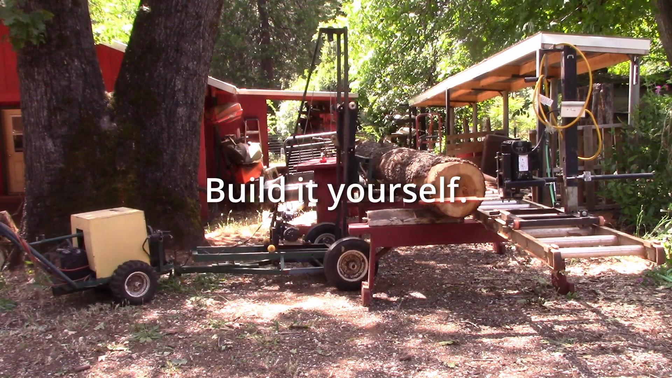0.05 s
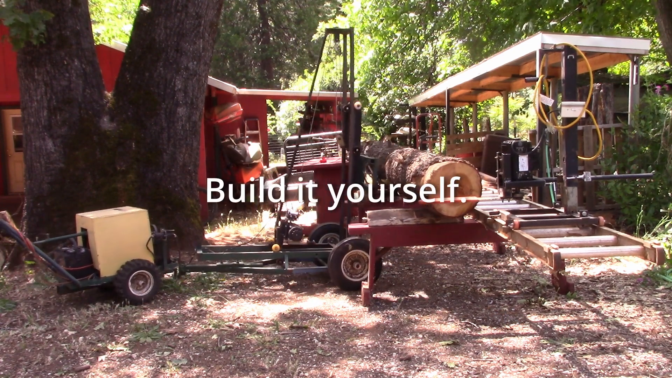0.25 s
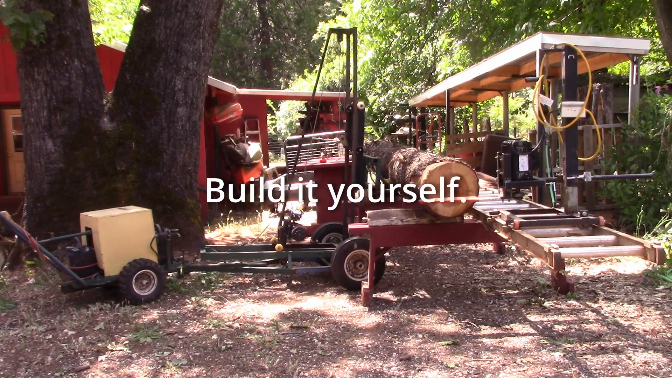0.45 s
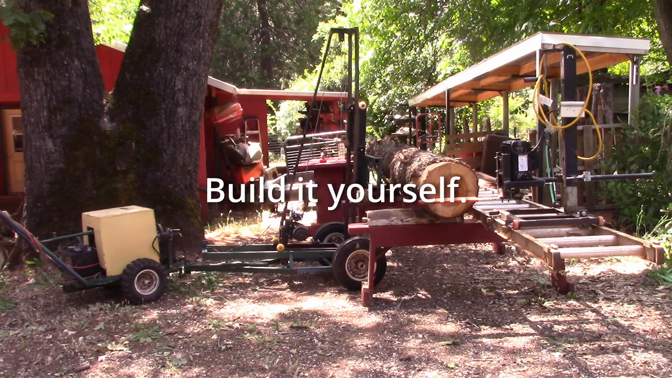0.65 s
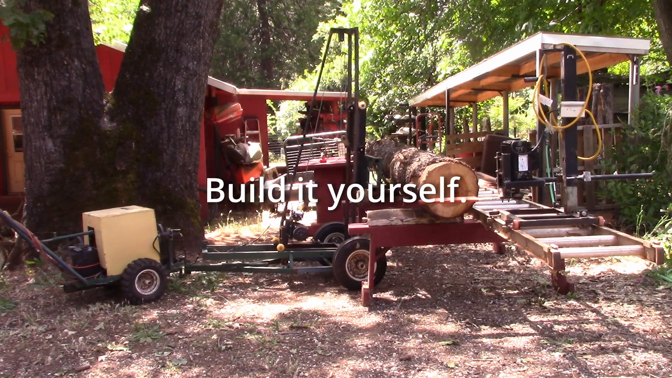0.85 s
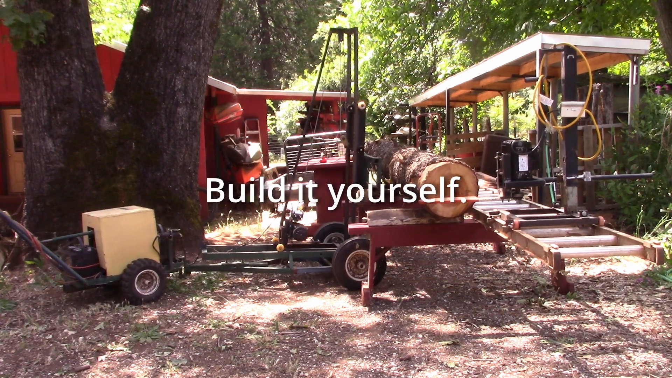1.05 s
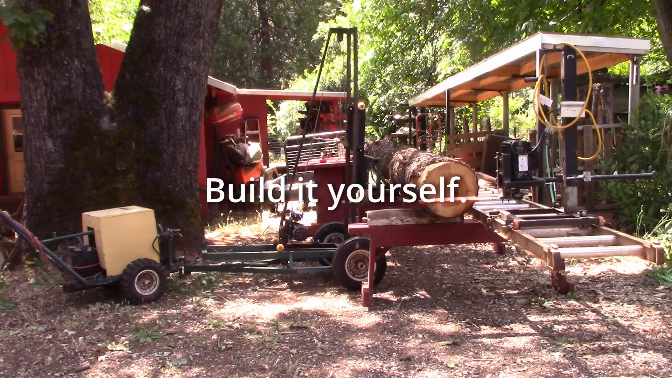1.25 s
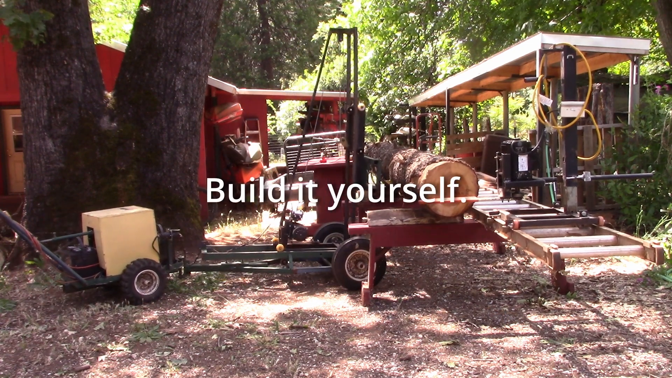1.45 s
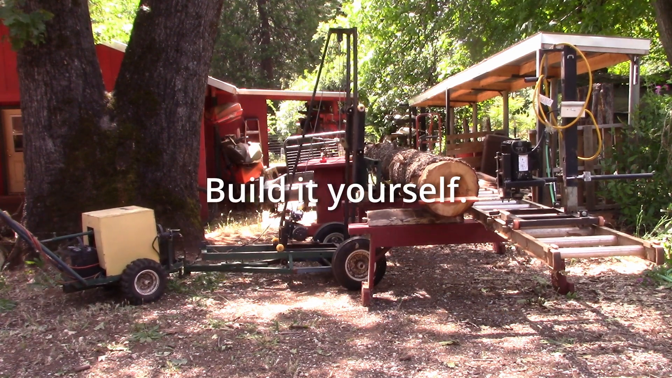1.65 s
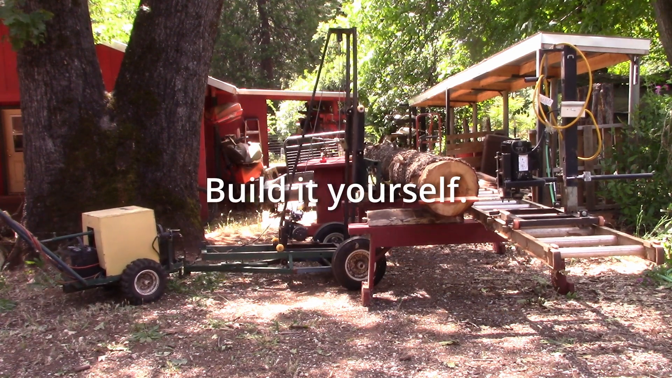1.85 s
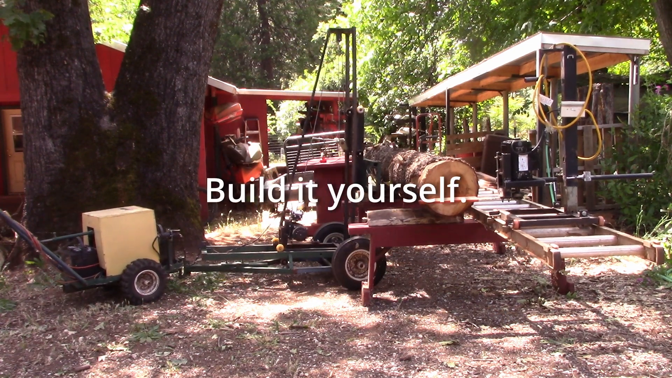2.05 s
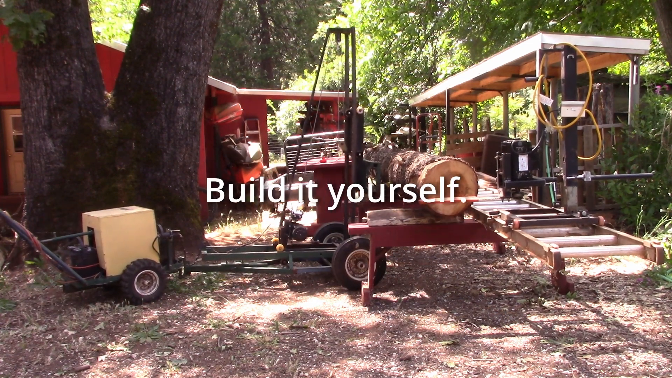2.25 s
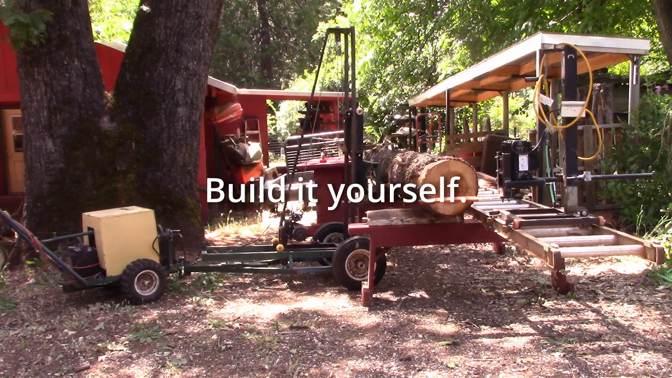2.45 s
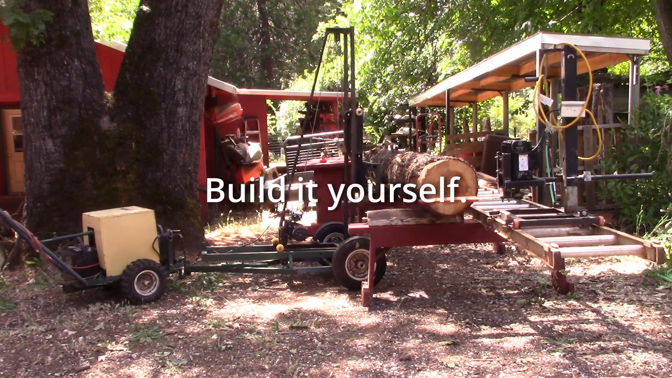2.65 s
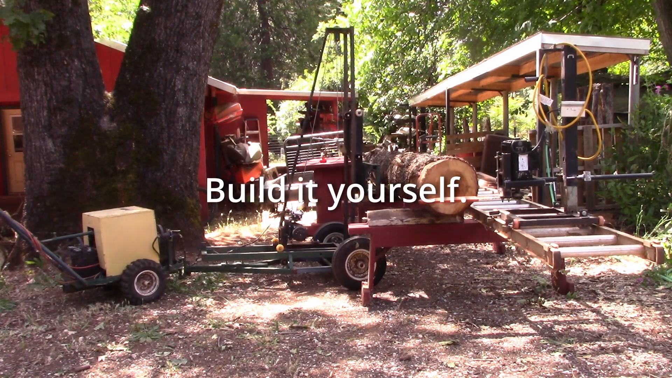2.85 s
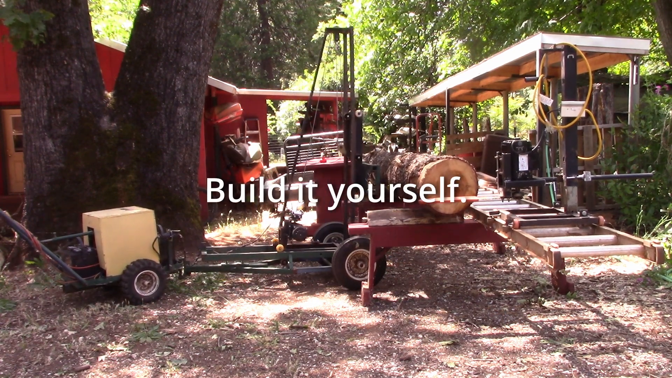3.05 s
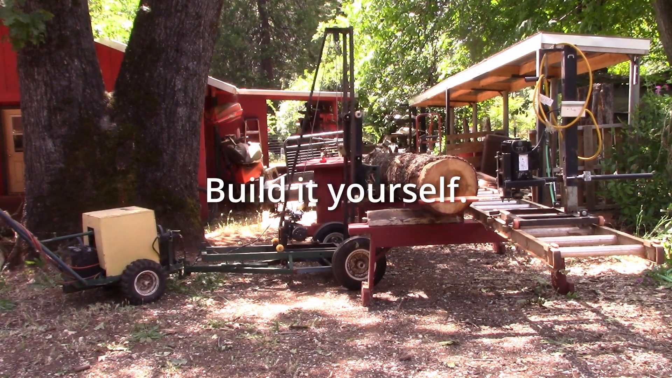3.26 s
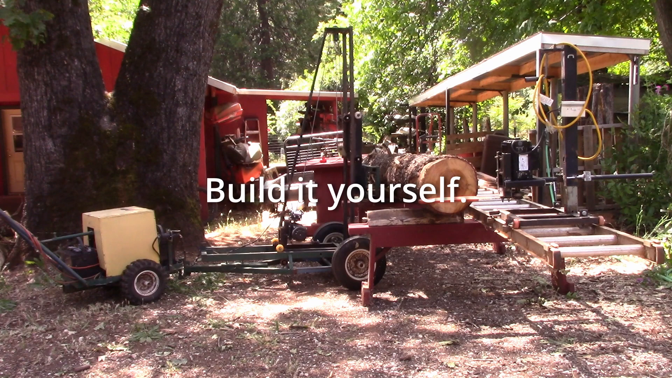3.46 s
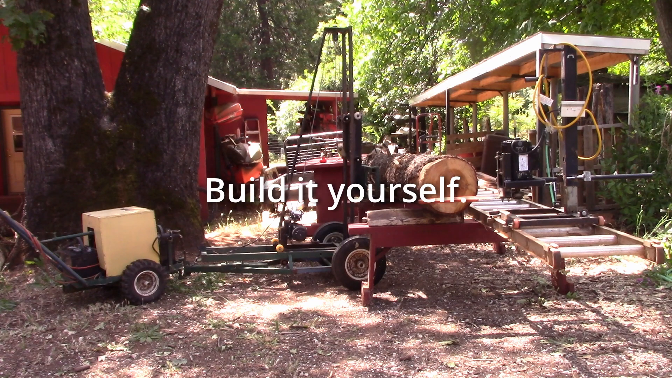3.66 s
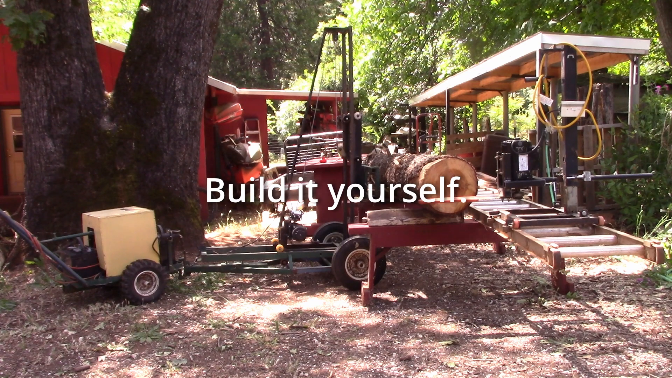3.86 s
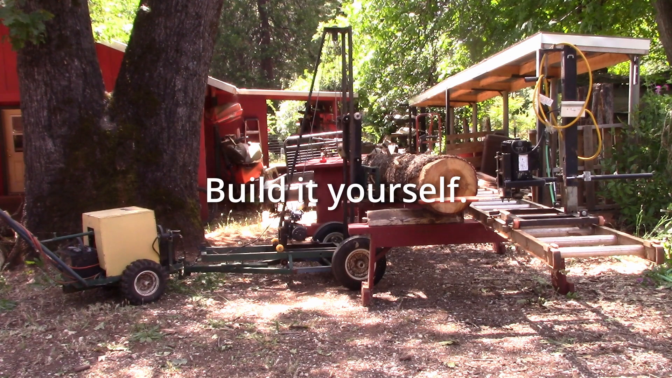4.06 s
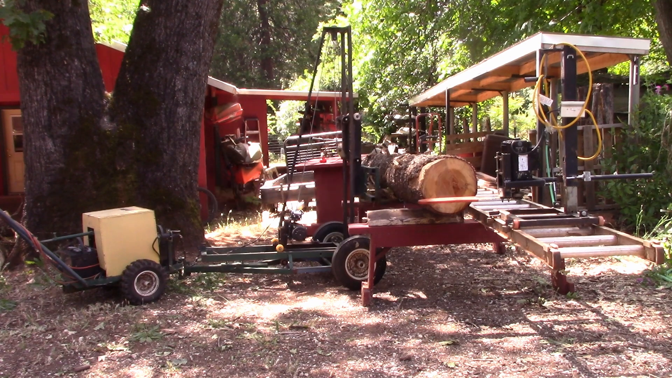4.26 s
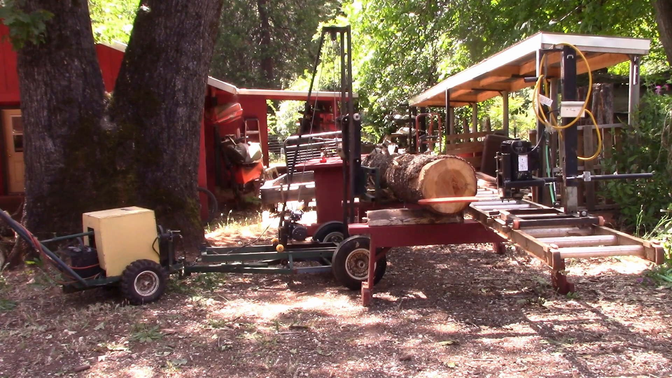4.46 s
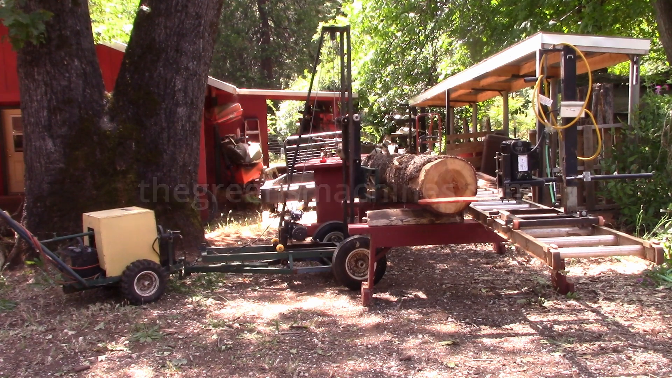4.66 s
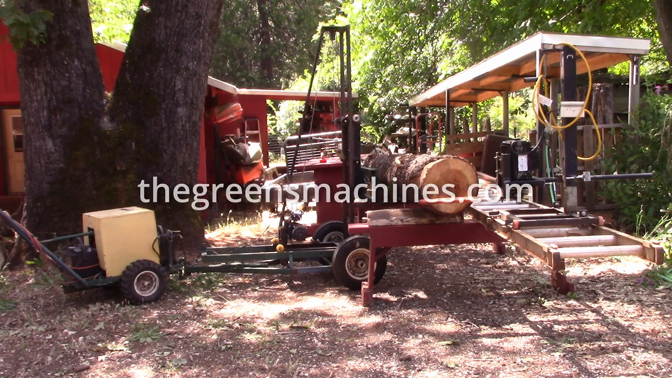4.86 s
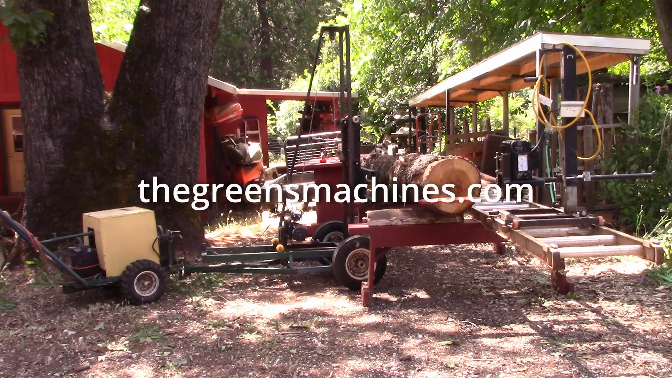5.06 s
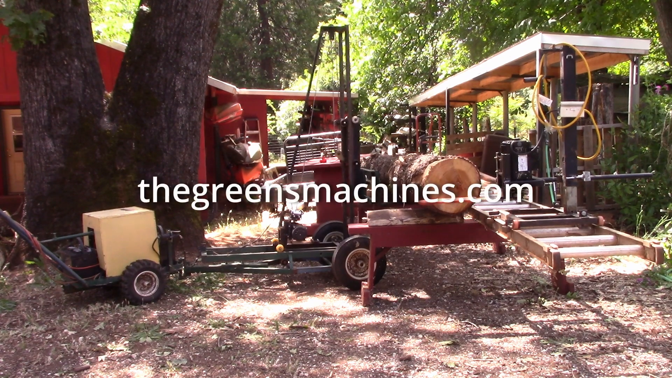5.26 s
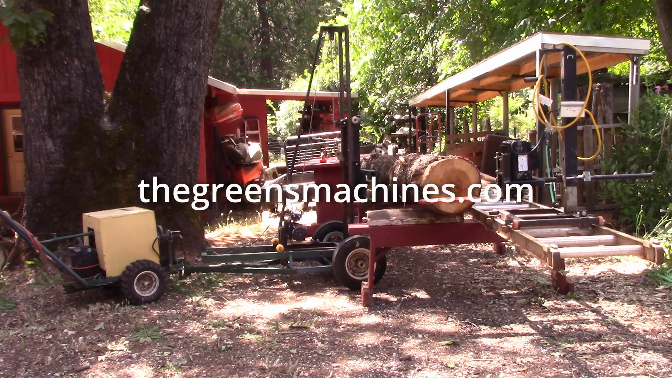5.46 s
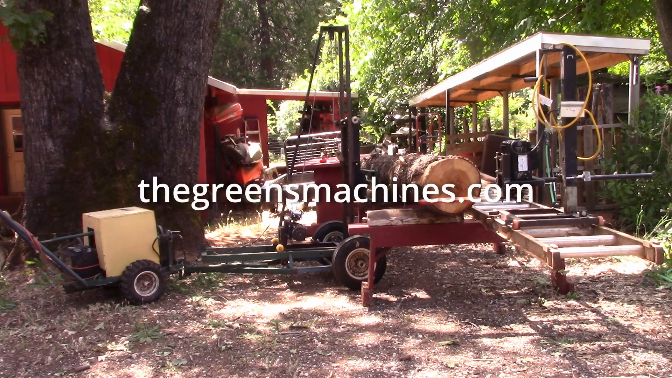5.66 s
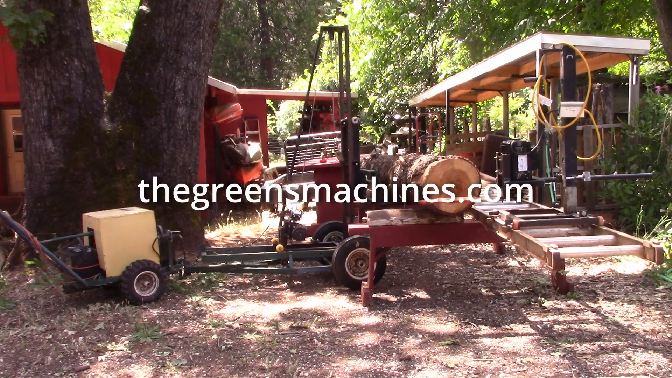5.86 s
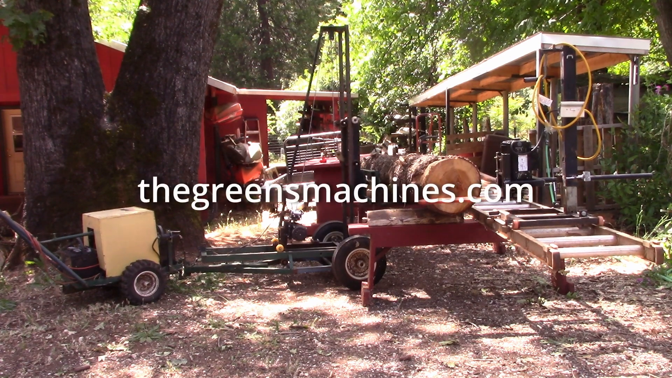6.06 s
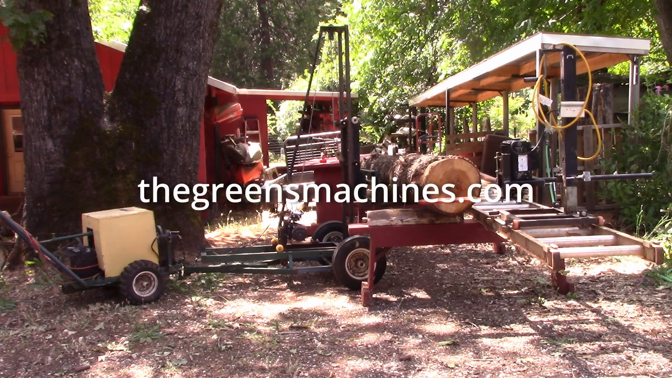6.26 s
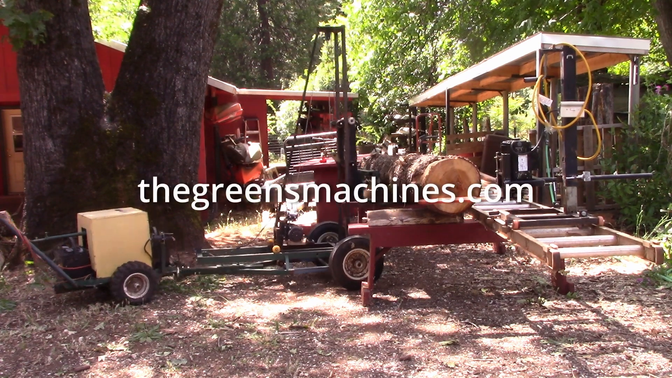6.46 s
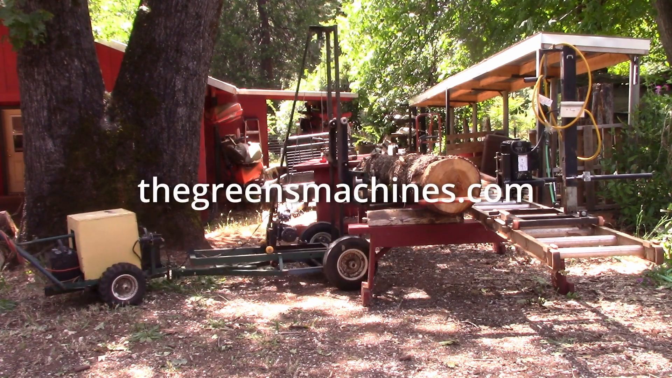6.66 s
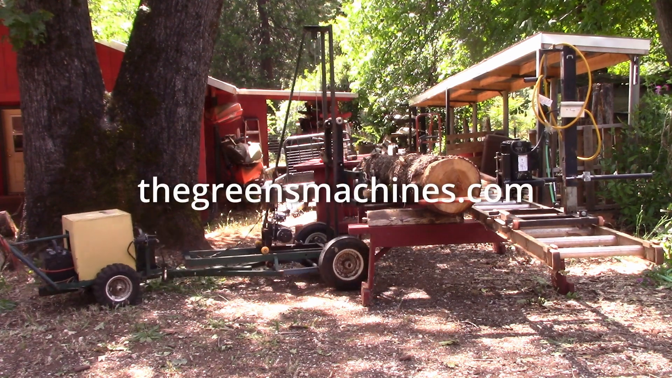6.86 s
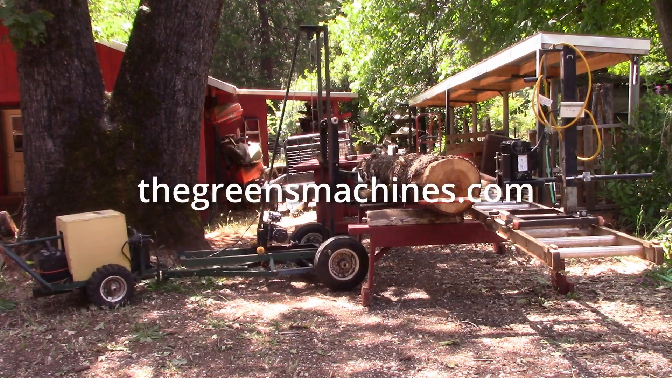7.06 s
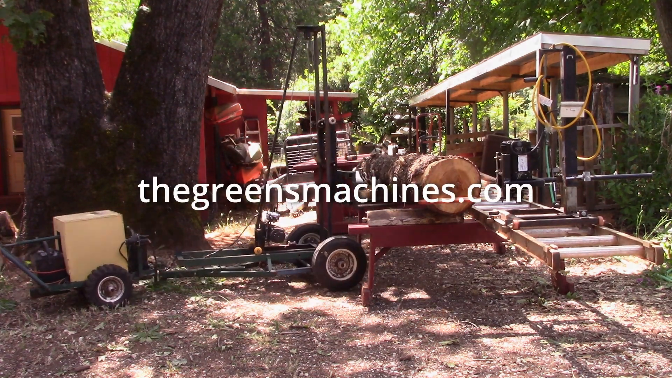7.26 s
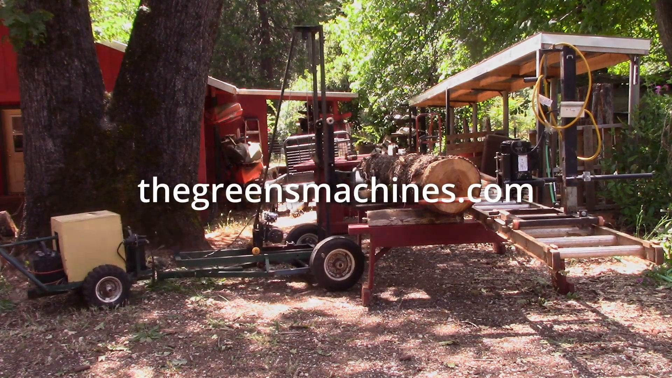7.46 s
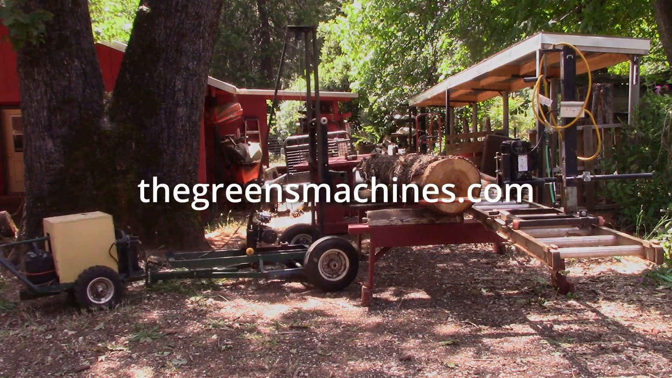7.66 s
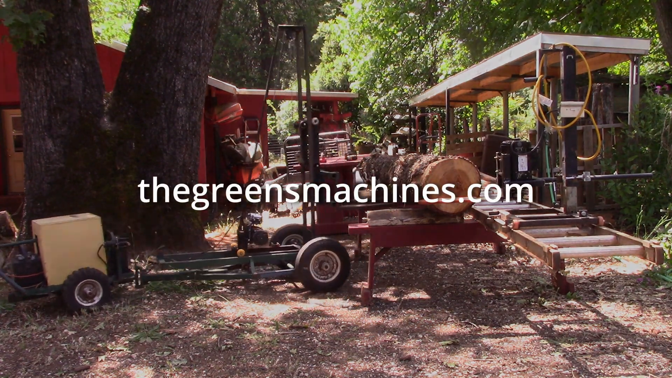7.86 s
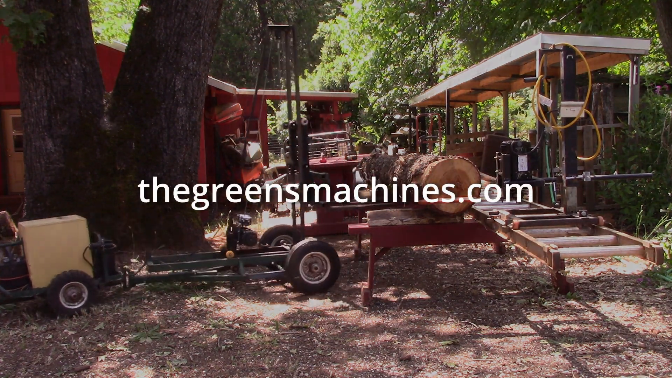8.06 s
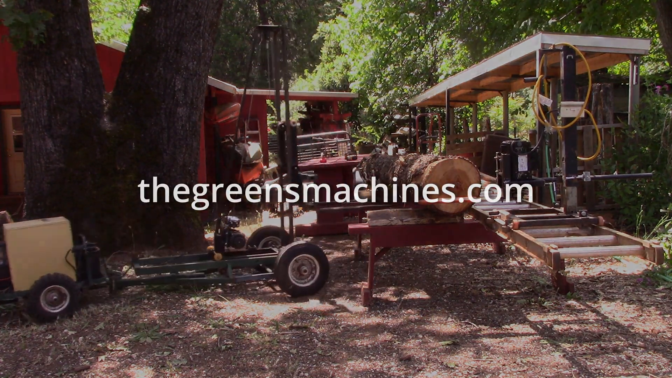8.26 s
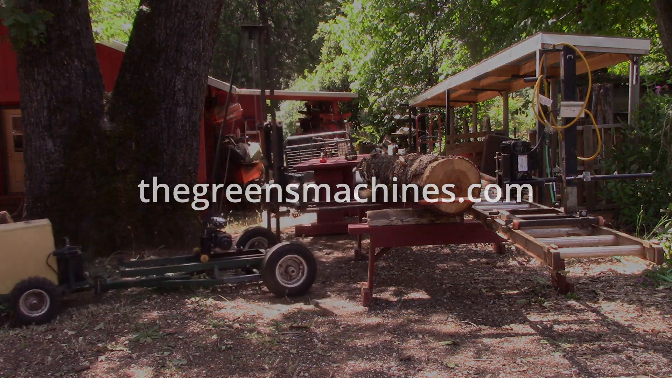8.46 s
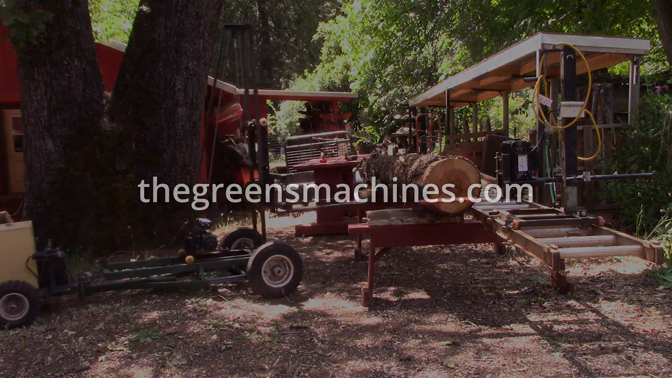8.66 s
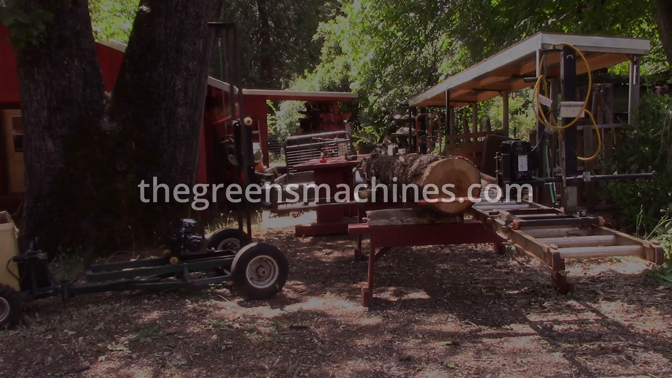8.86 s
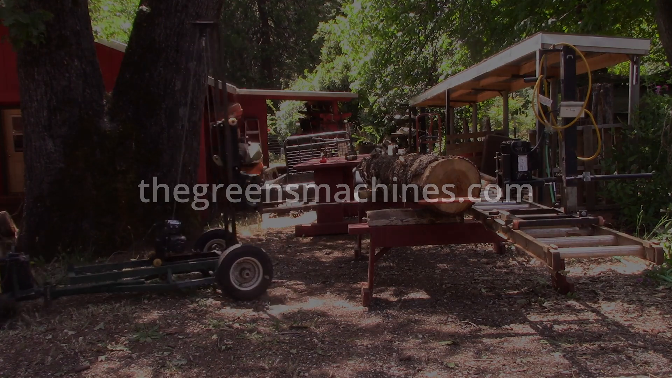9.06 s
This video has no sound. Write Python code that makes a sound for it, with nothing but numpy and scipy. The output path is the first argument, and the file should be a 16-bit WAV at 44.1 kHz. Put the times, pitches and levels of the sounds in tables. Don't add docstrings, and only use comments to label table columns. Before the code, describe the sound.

A small electric forklift cart works in a leafy yard. It coasts down with low rumble and frame ticks, then its lift whirs steadily twice with a gritty, brushy buzz and chain ticks. Dull knocks and light jingles follow. A sharp solenoid clack precedes a jolt, brief scrape and ringing steel clatter. A second clack starts the drive, whining upward until the end. Close outdoor pickup, slightly left of centre, with slight wind.

```python
import sys
import numpy as np
from scipy import signal
from scipy.fft import rfft, irfft, next_fast_len
from scipy.io import wavfile
from scipy.ndimage import uniform_filter1d

SR = 44100
rng = np.random.default_rng(int(sys.argv[2]) if len(sys.argv) > 2 else 0)


def to_linear_factor(level_db):
    exponent = np.asarray(level_db, float) / 20
    return 10 ** exponent


def inscribe(sig):
    pcm = np.round(np.clip(np.atleast_2d(sig).T, -1, 1) * 32767)
    wavfile.write(sys.argv[1], SR, pcm.astype(np.int16))


N = 402175
CLOCK = np.arange(N) / SR
LEFT_RIGHT = np.array([[1], [-1]])

# start_s, rumble_db
DRIVE = [
    [(0, -38.5), (.4, -48.5), (.6, -54), (.75, -65), (.93, -92)],
    [(6.13, -61), (6.16, -46), (6.2, -46), (6.3, -40), (6.55, -40.5), (6.8, -42), (7.1, -48.5),
     (7.3, -50.5), (7.44, -59)],
    [(7.38, -57), (7.46, -45), (7.74, -39), (8.05, -41), (8.38, -41), (8.8, -40.5), (9.12, -41.5)],
]
# pitch_hz, width_hz, level_db
LOAD_MODES = [(403, 38, 0.5), (518, 23, -3), (783, 86, -6.5), (1040, 72, -1.5), (1300, 1100, -8)]


def evened(x):
    return x / np.sqrt(np.mean(x ** 2) + 1e-20)


def peaked(x):
    return x / abs(x).max()


def read(points, hz):
    f, value = np.transpose(points)
    return np.interp(np.log(hz + 1), np.log(f + 1), value)


def column(tables, rest):
    out = np.full(N, float(rest))
    for rows in tables:
        rows = np.array(rows)
        on = (CLOCK >= rows[0, 0]) & (CLOCK <= rows[-1, 0])
        out[on] = np.interp(CLOCK[on], rows[:, 0], rows[:, 1])
    return out


def level(tables):
    return uniform_filter1d(to_linear_factor(column(tables, -150)), size=300)


def colour(x, points):
    n = next_fast_len(x.shape[-1])
    gain = to_linear_factor(read(points, np.fft.rfftfreq(n, 1 / SR)))
    return irfft(rfft(x, n) * gain, n)[..., :x.shape[-1]]


def body(x, modes):
    out = np.zeros(len(x))
    for k, (hz, width_hz, db) in enumerate(modes):
        peak = signal.iirpeak(hz, hz / max(width_hz, 4), SR)
        out += (-1) ** k * to_linear_factor(db) * signal.lfilter(*peak, x)
    return out


def in_phase(x, modes):
    return sum(body(x, [mode]) for mode in modes)


def dulled(x, hz):
    return signal.lfilter(*signal.butter(3, min(hz, .49 * SR), fs=SR), x)


def drift(hz):
    return evened(signal.lfilter(*signal.butter(2, hz, fs=SR), rng.standard_normal(N)))


def add(mix, start_s, sound):
    part = mix[round(start_s * SR):][:len(sound)]
    part += sound[:len(part)]


def burst(rise_s, t60_s, rattle_db, hold_s=0):
    t = CLOCK[:9000]
    noise, lumps = rng.standard_normal((2, 9000))
    lumps = evened(uniform_filter1d(lumps, size=40))
    fall_db = 60 * np.maximum(t - hold_s, 0) / max(t60_s, .004)
    return noise * to_linear_factor(rattle_db * lumps - fall_db) * (1 - np.exp(-(t / rise_s) ** 2))


def crackle(per_s, spread_db, modes):
    size = to_linear_factor(spread_db * np.minimum(rng.exponential(1, N), 4)) * (rng.random(N) < per_s / SR)
    shape = signal.oaconvolve(size, to_linear_factor(-60 * CLOCK[:2000] / 0.081))[:N]
    return evened(body(shape * rng.standard_normal(N), modes))


def echoes(x, t60_s):
    tail = rng.standard_normal((2, 16000)) * to_linear_factor(-60 * CLOCK[:16000] / t60_s)
    tail[:, :300] = 0
    return signal.fftconvolve(x[None], tail / np.linalg.norm(tail[0]), axes=1)[:, :N]


def yard():
    # pitch_hz, level_db_per_hz
    yard_spectrum = [(15, -69), (25, -50), (48, -16), (87, -19), (110, -9.5), (179, -2.5), (217, 1),
                     (291, -4), (343, -6.5), (449, -5.5), (4450, -24), (5090, -25), (15800, -41.5)]
    # pitch_hz, width_hz, level_db
    mains = [(62.4, 3.9, 10.5), (123.5, 7.3, 9)]
    # peak_s, peak_db, fall_db_per_s (both sides)
    breeze = [(0, -61, 42), (.66, -58, 78), (.91, -57.5, 74), (1.27, -65, 140), (2.59, -63, 170),
              (2.77, -60, 290), (6.65, -68, 43), (9.12, -78, 198)]
    mid, side = colour(rng.standard_normal((2, N)) * to_linear_factor(.8 * drift(6)), yard_spectrum)
    mid = mid + body(mid, mains)
    side = side + body(side, mains)
    hum = to_linear_factor(-62.5) * evened(mid + to_linear_factor(-11.0) * side * LEFT_RIGHT)
    gusts = np.array([rng.standard_normal(N) * to_linear_factor(4.2 * drift(13.0)) for ear in range(2)])
    wind = evened(colour(gusts, [(15, -14), (35, -18), (70, -0.5), (120, 4.0), (200, -9), (500, -53)]))
    calm_db = -87
    puffs = to_linear_factor(calm_db) + sum(to_linear_factor(db - fall * abs(CLOCK - s)) for s, db, fall in breeze)
    return hum + puffs * to_linear_factor(-1.5) * wind


def leaves():
    # start_s, peak_db
    snaps = [(0.9044, -59), (1.0335, -72), (1.6237, -45), (2.608, -50), (2.814, -52), (0.6112, -51),
             (5.067, -56), (8.52, -56), (8.21, -58), (7.256, -58), (7.3392, -61), (7.5398, -54),
             (7.6969, -52), (8.1094, -54), (8.8882, -44), (8.9174, -48), (8.9276, -47), (8.9454, -48),
             (8.9594, -50), (8.9744, -60)]
    out = np.zeros(N)
    for start_s, db in snaps:
        snap = colour(burst(.0003, 0.025, 2.7), [(3000, -20), (7000, 7), (11000, -2), (15000, -10)])
        add(out, start_s, to_linear_factor(db) * peaked(snap))
    return out


def frame_hum():
    # start_s, length_s, level_db
    swells = [
        (1.426, 2.36, -57),
        (4.034, 0.32, -65.5),
    ]
    turn = 2 * np.pi * np.cumsum(425.5 + .8 * drift(8)) / SR
    tones = to_linear_factor(1.2 * drift(10)) * np.sin(turn)
    tones += to_linear_factor(-14 + 3.0 * drift(2.5)) * np.sin(1.393 * turn)
    swell = np.zeros(N)
    for start_s, length_s, db in swells:
        arch = abs(np.sin(np.pi * np.clip((CLOCK - start_s) / length_s, 0, 1))) ** 0.45
        swell += to_linear_factor(db) * arch * (CLOCK < start_s + length_s)
    return swell * np.sqrt(2) * tones


def slack():
    # start_s, peak_db, t60_s
    jingles = [(5.13, -60, 2), (5.255, -43, -0.1), (5.295, -50, 1), (5.34, -46, 0), (5.392, -54, -2),
               (5.455, -45, -0.53), (5.51, -65, 0.3), (6.9, -65, 6), (7.1, -66.5, 6), (7.715, -56, 0.5),
               (7.95, -60, -3), (8.01, -58, -2)]
    # pitch_hz, width_hz, level_db
    link_rings = [(5900, 340, -1), (8360, 450, 1), (9480, 330, 2)]
    out = np.zeros(N)
    for start_s, db, t60_s in jingles:
        jingle = dulled(body(burst(0.0021, t60_s, 2.3), link_rings), 11700)
        add(out, start_s, to_linear_factor(db) * peaked(jingle))
    return out


def ticks():
    # start_s, peak_db, brightness_db, thud_db
    joints = [(0.073, -41.5, 0, -3), (0.0832, -40, -1, 2), (0.197, -44, -5, -11), (0.297, -45, -7, -16),
              (0.3527, -43, -3, -3), (0.364, -44, -4, -5), (0.444, -53.5, 9, 10.5), (0.454, -58, 10, -10),
              (0.6115, -55, -2, 5.5), (0.506, -55, -12, 2), (0.676, -56, -17, 5), (0.83, -57.5, -16, 3),
              (6.2384, -59, -17, 3), (6.276, -54, -17, 7), (6.394, -41, -4, 6), (7.054, -56, -6, -7),
              (7.657, -53, -9, 1), (6.2927, -33, -10, -10), (6.316, -45, -3, -18), (6.3685, -33, -8.5, -1),
              (6.466, -33, -8, -13), (6.484, -37.5, -1, 3), (7.6847, -50, -11, -12), (7.8303, -47, -19, -8),
              (8.7256, -36.5, -8, 5)]
    links = [(1.021, -53, -2, -6), (1.06, -53, -13, 9), (1.6244, -25.5, -8, -13), (2.8086, -44.5, 6, 2),
             (3.941, -53.5, 2, -11), (4.341, -45, 3, -2), (4.7644, -56, 14, -10), (5.0662, -35, 2, -1),
             (5.2953, -39, -2, -18), (4.86, -51, 9, 0), (4.905, -52, 13.5, -8), (5.4562, -38, -2, -5.5)]
    pins = [(0.099, -45.5, -2, -4), (0.258, -53, 2, -4), (2.892, -37, -1, -22), (2.943, -38, 1, -10),
            (3.032, -36, -5, -17), (7.715, -37, -16, -15)]
    # t60_s, edge_hz
    kinds = [
        (0.058, 5500),
        (0.059, 7000),
        (0.083, 7500),
    ]
    clink_modes = [(1760, 180, 2), (2400, 300, -0.5), (2910, 125, 7.5), (3720, 400, 4.0), (4720, 380, 0.0)]
    out = np.zeros(N)
    rows = [(*row, *kind) for table, kind in zip((joints, links, pins), kinds) for row in table]
    for start_s, db, bright_db, thud_db, t60_s, edge_hz in rows:
        clink = dulled(body(burst(0.00086, t60_s, 0.89), clink_modes), 4500)
        edge = body(burst(0.00035, 0.98 * t60_s, 4.2), [(edge_hz, 1800, 0), (1.86 * edge_hz, 3000, -14)])
        edge = dulled(edge, 1.84 * edge_hz)
        thud = dulled(body(burst(0.00057, 3.9 * t60_s, 0.55), LOAD_MODES), 2230)
        tick = peaked(clink) + to_linear_factor(bright_db) * peaked(edge) + to_linear_factor(thud_db) * peaked(thud)
        add(out, start_s, to_linear_factor(db - 4.5) * tick)
    return out


def load():
    # start_s, peak_db, clank_db, t60_s
    knocks = [(0.935, -52, -20, 0.14), (0.956, -48.5, -20, 0.13), (2.031, -46, 3, 0.087),
              (2.471, -37, -22, 0.11), (2.514, -42, -47, 0.11), (5.065, -51, -6, 0.092),
              (5.329, -30, 2.5, 0.096), (5.343, -37.5, -18, 0.21), (5.367, -37.5, -9, 0.18),
              (6.314, -38.5, 5, 0.044), (6.37, -43, -0.5, 0.04), (6.47, -43, 0, 0.061)]
    # pitch_hz, width_hz, level_db
    clank_modes = [(2290, 83, 11.5), (2650, 110, 2.5), (3110, 84, 10.5), (3770, 100, 1), (4440, 330, -5),
                   (6160, 490, -15)]
    # start_s, peak_db, pitch_hz
    bumps = [(0.791, -45, 190), (.882, -52, 150), (.905, -51, 170), (1.006, -63, 170), (6.316, -29, 247)]
    out = np.zeros(N)
    for start_s, db, clank_db, t60_s in knocks:
        blow = burst(.0012, t60_s, 3.0)
        knock = peaked(dulled(body(blow, LOAD_MODES), 1550))
        clank = peaked(dulled(body(blow, clank_modes), 5600))
        add(out, start_s, to_linear_factor(db) * (knock + to_linear_factor(clank_db) * clank))
    for start_s, db, hz in bumps:
        turn = CLOCK[:1500] * hz
        add(out, start_s, to_linear_factor(db + 4) * np.sin(2 * np.pi * turn) * np.exp(-1.8 * turn))
    return out


def lift_gain(order, up_s, stop_db_per_s, loaded):
    # start_s, length_s, ring_db, hiss_db, let_go_s (before the end)
    runs = [
        (1.045, 2.605, -43.5, -56, 0.0099),
        (3.949, 1.556, -45.5, -61, 0.038),
    ]
    out = np.zeros(N)
    for row in runs:
        t = CLOCK - row[0]
        spin_up_db = -22.5 * np.exp(-np.maximum(t, 0) / up_s)
        fall_db = stop_db_per_s * np.maximum(t - row[1] + loaded * row[4], 0)
        out += to_linear_factor(row[order] + spin_up_db - fall_db) * (t > 0)
    return out


def lift():
    # pitch_hz, width_hz, level_db
    housing = [(625, 7.5, -13), (795, 15, -19.5), (906, 47, -17.5), (1396, 510, -17), (1638, 186, -2),
               (1742, 81.4, 3), (2078, 110, -10), (2143, 71, -7.5), (2680, 38, -15), (2746, 45, -15.5),
               (2995, 130, -17), (3420, 47, -55), (4040, 140, -20.5), (4800, 40, -41)]
    # pitch_hz, level_db_per_hz
    hiss_spectrum = [(180, -62), (300, -26), (391, -10), (418, -11), (519, -14.5), (1130, -23),
                     (1740, -8.5), (2390, -12.5), (2960, -15), (4560, -18), (5290, -31.5), (8280, -32),
                     (15800, -53.5)]
    # pitch_hz, width_hz, level_db
    hiss_rings = [(6070, 580, 10), (8010, 220, 13.5), (8175, 240, 11), (9500, 320, 13.5),
                  (11000, 700, -2.5)]
    shaft_hz = 29.1
    turns = 2 * np.pi * np.cumsum(shaft_hz * (1 + 0.05 * drift(1.66))) / SR
    throb_db = 0.48 * np.cos(turns) + 0.9 * np.cos(2 * turns + 1.3) + 0.9 * drift(60) + 1.3 * drift(140)
    teeth = rng.standard_normal(N) * to_linear_factor(throb_db)
    load_sway_db = -0.73 * drift(24.4) - 0.95
    ring = to_linear_factor(load_sway_db) * evened(dulled(body(teeth, housing), 7500))
    ring *= lift_gain(order=2, up_s=0.052, stop_db_per_s=302, loaded=True)
    brushes = rng.standard_normal(N) * to_linear_factor(0.7 * throb_db + 0.95 * drift(270))
    hiss = evened(colour(brushes + body(brushes, hiss_rings), hiss_spectrum))
    chain = crackle(37, 1.0, [(5780, 240, 5.5), (8700, 930, 2.5), (9600, 730, -8)])
    hiss += to_linear_factor(-15.0) * dulled(chain, 10300)
    return ring + lift_gain(order=3, up_s=0.064, stop_db_per_s=211, loaded=False) * to_linear_factor(5.0) * hiss


def solenoid():
    # start_s, peak_db
    clacks = [
        (6.0846, -24),
        (7.37, -24.5),
    ]
    # pitch_hz, level_db_per_hz
    clack_spectrum = [(410, -53), (700, -11), (1020, -36), (1380, -7.5), (2260, -3), (2940, -3), (3870, -7),
                      (6350, -6.5), (7520, -15), (10600, -16), (15800, -42)]
    # pitch_hz, width_hz, level_db
    clack_rings = [(1335, 210, -3), (2140, 170, -18), (3000, 660, 9), (3160, 300, -14), (4540, 250, 0),
                   (6160, 200, -28), (9300, 1600, 0.5), (11200, 350, -8)]
    out = np.zeros(N)
    for start_s, db in clacks:
        slam = burst(0.0046, 0.038, 0.75, hold_s=0.0101)
        slam = peaked(evened(colour(slam, clack_spectrum)) + .5 * evened(body(slam, clack_rings)))
        after = body(burst(0.013, 0.6, 1.2), [(2980, 2100, -7.5), (4740, 1700, -6.0), (9500, 3500, -29)])
        add(out, start_s - .003, to_linear_factor(db) * (slam + to_linear_factor(-20.0) * peaked(after)))
    return out


def chassis_rumble():
    # pitch_hz, width_hz, level_db
    chassis = [(224, 30, -4.5), (266, 30, -2.5), (400, 46, 2.5), (515, 80, -4), (590, 50, -9),
               (680, 70, -12), (880, 260, -19), (1140, 260, -18)]
    knocks = rng.standard_normal(N) * to_linear_factor(1.8 * drift(68))
    rings = np.zeros(N)
    for k, (hz, width_hz, db) in enumerate(chassis):
        once = body(knocks, [(hz, width_hz, db)])
        rings += (-1) ** k * body(once, [(hz, width_hz, 0)])
    rumble = level(DRIVE) * evened(dulled(rings, 754))
    flex_s = .0012 * drift(4)
    return np.interp(CLOCK + flex_s, CLOCK, rumble)


def gear_grind(mesh_hz):
    # pitch_hz, level_db_per_hz
    gear_spectrum = [(410, -7.5), (700, 2), (798, -14), (874, -1), (1160, -7), (1290, -6.5), (1770, -12.5),
                     (3100, -13), (4890, -23.5), (5500, -24.5), (6860, -23.5), (11700, -37), (15800, -52)]
    # pitch_hz, width_hz, level_db
    gear_rings = [(2090, 52, -7), (2820, 37, -2), (3140, 690, -2.5), (4830, 320, 12.5), (6830, 300, -4),
                  (8750, 100, -17), (10940, 210, -15), (11600, 360, 5.5)]
    run_db = [-50, -45.5, -47]
    run_slope = [1, 1.64, 1.3]
    full_effort_db = -40.5
    grind = rng.standard_normal(N) * to_linear_factor(1.14 * drift(114) + 1.26 * drift(15))
    grind = grind + (mesh_hz / 1300) ** 0.59 * body(grind, gear_rings)
    grind = to_linear_factor(-3.5) * evened(colour(grind, gear_spectrum))
    gain = np.zeros(N)
    for run, top_db, slope in zip(DRIVE, run_db, run_slope):
        gain += level([[(s, top_db + slope * (db - full_effort_db)) for s, db in run]])
    return gain * np.maximum(mesh_hz / 800, 1) ** 1.72 * grind


def fizz(mesh):
    # mesh_multiple, width_hz, level_db, patchiness_db
    bands = [(3.7, 350, -16, 2.5), (5.2, 300, -15, 2.5), (8.8, 350, -26, 1.5)]
    out = np.zeros(N)
    for k, width_hz, db, patchy_db in bands:
        out += to_linear_factor(db + patchy_db * drift(25)) * drift(width_hz) * np.sin(k * mesh)
    return out


def gear_whine(mesh_hz):
    orders = [1, 1.25, 1.5, 1.75, 2, 2.25, 2.5, 2.75, 3, 3.25, 3.5, 3.75, .226, .302, .358, .377, .453,
              .513, .604, .678, .75]
    orders_db = [-3, -12, -14, -11.5, -11, -11, -17, -14, -19, -23, -24, -25, -6, -8, -2, 0, 0, -7, -14, -6,
                 -11]
    # pitch_hz, width_hz, level_db
    case_rings = [(405, 50, 10), (520, 100, 5), (690, 50, 6), (1250, 200, 8), (2110, 130, 14),
                  (2320, 110, 9), (2590, 60, 13), (2850, 70, 8), (3050, 70, 11), (3200, 110, 13),
                  (3500, 120, 3)]
    mesh = 2 * np.pi * np.cumsum(mesh_hz * (1 + 0.00504 * drift(43.4))) / SR
    gather_hz_per_s = uniform_filter1d(np.gradient(mesh_hz) * SR, size=6000)
    pull_db = 9.0 * np.clip(gather_hz_per_s / 800, 0, 1)
    whine = np.zeros(N)
    for k, db in zip(orders, orders_db):
        order_db = db + pull_db * (1.2 if k < .9 else .35) + (0.5 + 0.71 * k) * drift(9.5)
        runout = 1 + (k > 1) * .5 * np.cos(.056 * mesh + 7 * k)
        whine += to_linear_factor(order_db) * np.sin(k * mesh) * runout
    whine += in_phase(whine, case_rings) + fizz(mesh)
    return to_linear_factor(-55.5) * (mesh_hz / 1300) ** 3.2 * whine


def drive():
    # start_s, mesh_hz
    spool_up = [(7.44, 610), (7.6, 738), (7.85, 922), (8.12, 1144), (8.27, 1238), (8.45, 1285), (8.8, 1330),
                (9.12, 1352)]
    mesh_hz = column([spool_up], rest=800)
    spooling = CLOCK > spool_up[0][0]
    return chassis_rumble() + gear_grind(mesh_hz) + spooling * gear_whine(mesh_hz)


def scrape():
    # start_s, level_db
    drag = [(6.2, -85), (6.29, -67), (6.36, -54), (6.41, -56), (6.43, -57), (6.47, -47.5), (6.51, -49),
            (6.53, -70)]
    # pitch_hz, width_hz, level_db
    drag_rings = [(990, 220, 3), (1670, 240, 4), (2530, 400, 7), (2820, 220, 8.5), (3800, 450, -24)]
    return level([drag]) * dulled(crackle(260, 4.8, drag_rings), 4500)


def crash():
    # start_s, level_db
    chatter_level = [(6.51, -80), (6.524, -53), (6.554, -33), (6.566, -33), (6.602, -24), (6.618, -24.5),
                     (6.635, -30.5), (6.66, -33.5), (6.7, -41.5), (6.766, -49.5), (7.05, -80)]
    # start_s, peak_db
    blows = [
        (6.5225, -18),
        (6.563, -17.5),
        (6.6118, -15.5),
        (6.654, -26),
    ]
    # pitch_hz, width_hz, level_db
    steel_rings = [(1130, 70, -9), (1490, 78, 18), (2500, 73, -3), (3390, 83, 19), (4200, 52, 18.5),
                   (4580, 150, 19), (5030, 76, 9), (5800, 160, 0), (5920, 100, 13), (6830, 170, -4),
                   (7850, 180, -5), (8300, 480, -1), (9400, 180, 2)]
    # pitch_hz, level_db_per_hz
    steel_spectrum = [(240, -6), (400, -20), (696, -6), (799, -2.5), (1460, 1.5), (1890, -8), (3450, 1.5),
                      (4760, -4), (9090, -15.5), (11500, -26.5), (15800, -48)]
    chatter = rng.standard_normal(N) * to_linear_factor(2.8 * drift(250) + 1.2 * drift(60))
    steel = evened(colour(chatter, steel_spectrum))
    steel += 0.86 * evened(dulled(body(chatter, steel_rings), 11700))
    out = level([chatter_level]) * to_linear_factor(-2.75) * evened(steel)
    for start_s, db in blows:
        hit = burst(0.00015, 0.2, 0.71)
        blow = evened(colour(hit, steel_spectrum)) + 0.24 * evened(dulled(body(hit, steel_rings), 3600))
        add(out, start_s, to_linear_factor(db - 2.0) * peaked(blow))
    return out


def scene():
    cart = leaves() + slack() + ticks() + load() + lift() + solenoid() + drive() + scrape() + crash()
    cart = signal.sosfilt(signal.butter(4, 178, "highpass", fs=SR, output="sos"), cart)
    left, right = echoes(cart, 0.23)
    side = colour(left - right, [(100, -81), (400, -38.0), (1500, -31.0), (3000, -24.0), (5000, -19.0),
                                 (8000, -24), (15000, -21)])
    mid = cart + frame_hum() + to_linear_factor(-14.0) * (left + right)
    return mid * to_linear_factor(.25 * LEFT_RIGHT) + side * LEFT_RIGHT + yard()


def top_cut(x):
    return signal.sosfilt(signal.butter(12, 15970, fs=SR, output="sos"), x)


def record(dry):
    return top_cut(dry)


dry = scene()
out = record(dry)
inscribe(out)
```